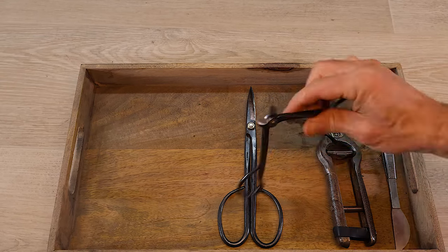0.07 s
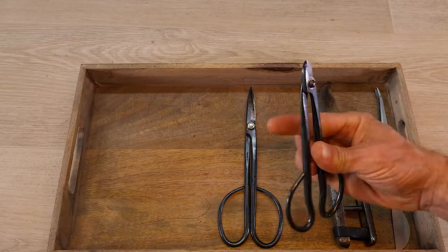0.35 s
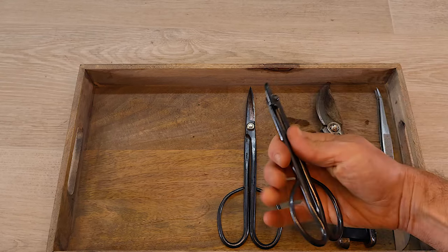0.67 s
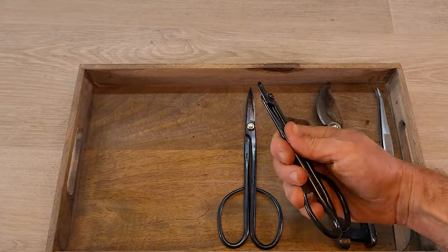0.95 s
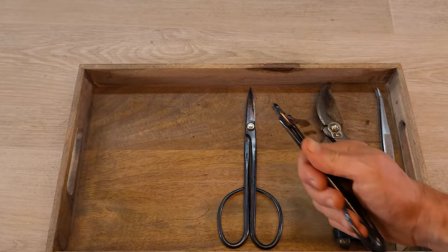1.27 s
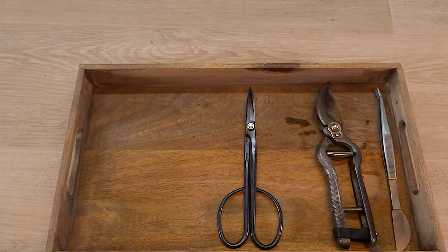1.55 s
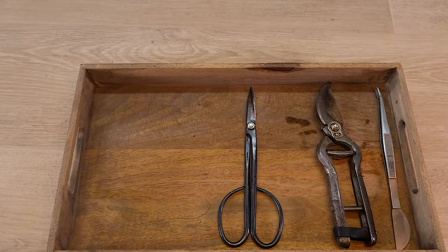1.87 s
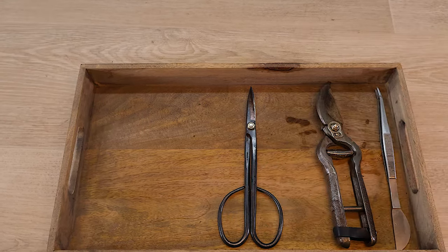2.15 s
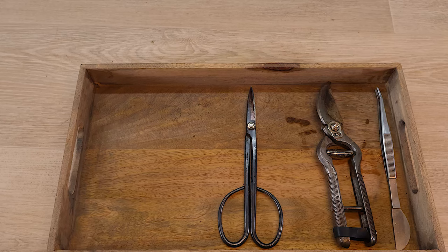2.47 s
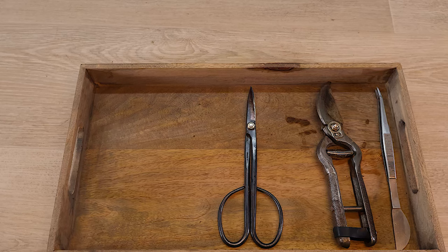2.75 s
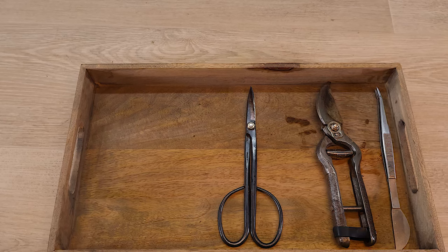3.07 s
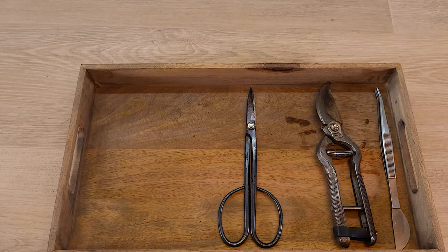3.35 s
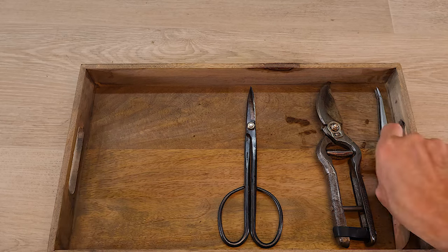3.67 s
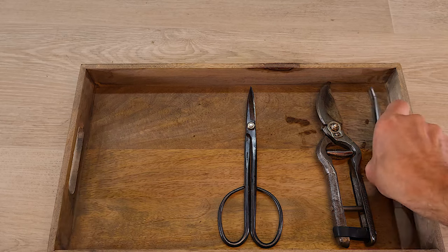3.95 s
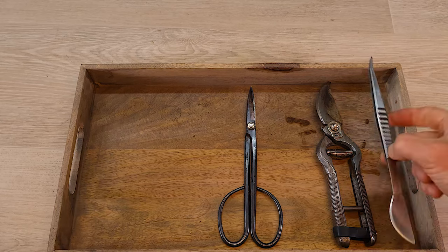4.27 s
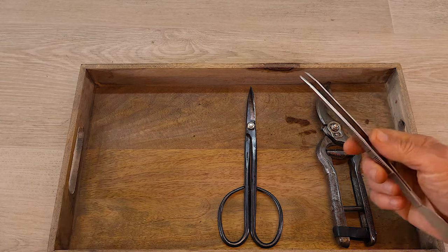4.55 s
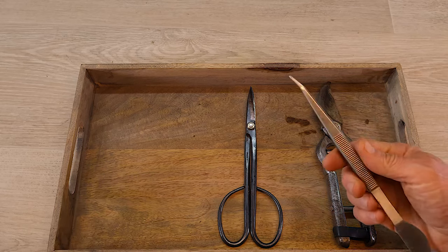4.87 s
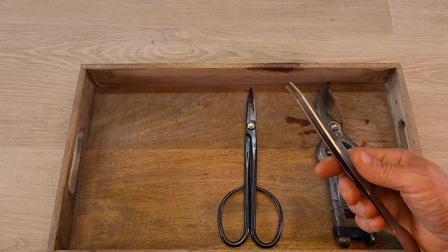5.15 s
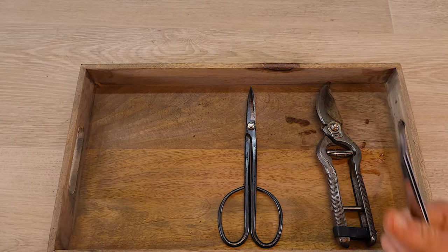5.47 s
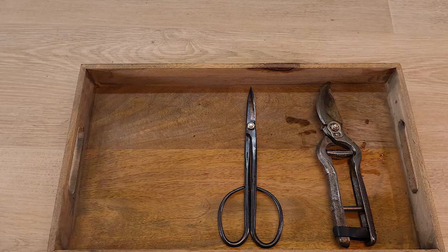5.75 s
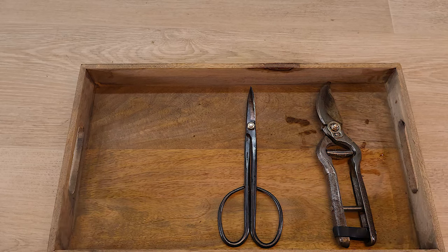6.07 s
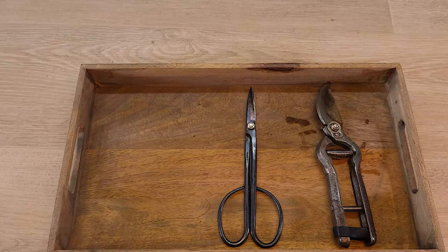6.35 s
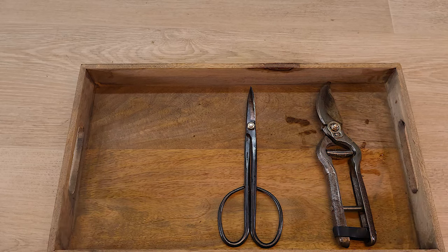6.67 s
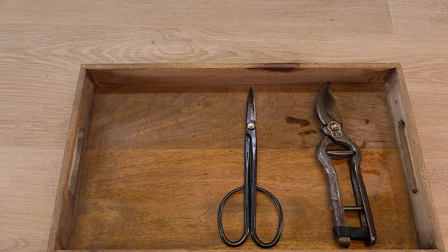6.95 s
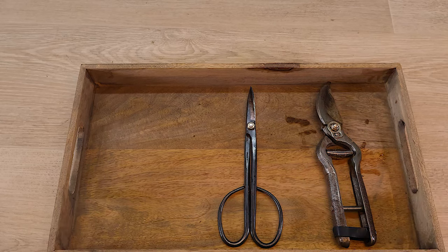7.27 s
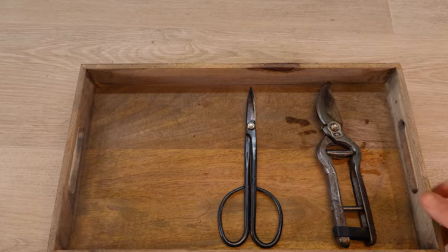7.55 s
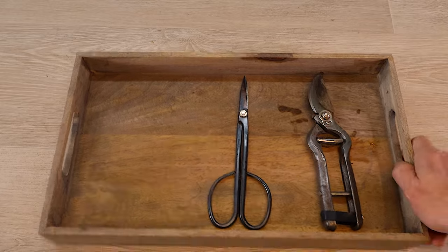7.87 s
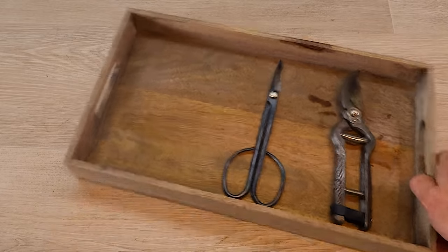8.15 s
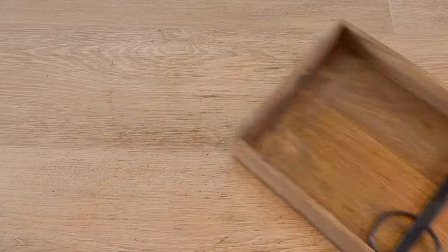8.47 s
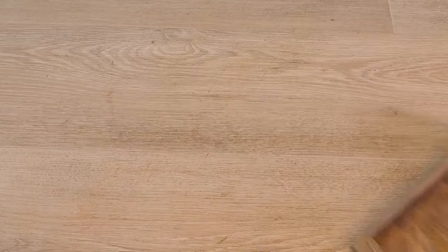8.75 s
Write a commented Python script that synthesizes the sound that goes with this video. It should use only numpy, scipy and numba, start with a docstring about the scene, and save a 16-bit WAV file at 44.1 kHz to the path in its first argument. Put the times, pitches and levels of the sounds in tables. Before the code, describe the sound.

Metal hand tools are handled on a wooden tray, heard up close over a faint room hum. Scissors clink, shears clack, and after a pause a cluster of hard knocks hits the wood. Short steel scrapes and bright, ringing clinks follow. At the end the tray scrapes across a table in a growing judder, booms once loudly and finishes with a short rasp.

```python
"""In a quiet room, a knock and a short slide on a wooden tray, then steel scissors clink.
The handle of a pair of shears clacks at 2 s, and hard knocks hit the tray around 4 s.
From about 6 s steel slides on the wood; shear blade, scissors and tweezers clink and ring.
Near 8 s the tray is dragged over the table: it judders and hisses, thumps loudly once, then ends in
a quick rasp. The microphone is close; its limiter ducks the room noise after the hardest blows."""
import sys
import numpy as np
from scipy import signal
from scipy.fft import rfft, irfft
from scipy.io import wavfile
from scipy.ndimage import uniform_filter1d, minimum_filter1d
from numba import njit

SR = 44100
rng = np.random.default_rng(int(sys.argv[2]) if len(sys.argv) > 2 else 0)


def bounce(signal):
    """Save signal as a 16-bit WAV file at the path given by the first command-line argument."""
    frames = np.transpose(np.atleast_2d(signal))
    limited = np.clip(frames, -1, 1)
    pcm = np.round(limited * 32767).astype(np.int16)
    wavfile.write(sys.argv[1], SR, pcm)


N = 392931
EVENT_SAMPLES = SR // 2


def undb(db):
    """Decibels to gain."""
    return 10 ** (np.asarray(db) / 20)


def unit_energy(x):
    """Scale to an energy of one."""
    return x / np.sqrt(np.sum(x ** 2))


def unit_rms(x):
    """Scale to an rms of one."""
    return x / np.std(x)


def add(out, start_s, x):
    """Mix x into out from start_s."""
    i = max(int(start_s * SR), 0)
    out[i:i + len(x)] += x[:N - i]


def colour(x, points, size=2048):
    """Causal filter through (Hz, dB) points, built from the cepstrum of the log gain."""
    hz, db = np.transpose(points)
    bins_hz = np.maximum(np.arange(size // 2 + 1) * SR / size, 1)
    gain = undb(np.interp(np.log(bins_hz), np.log(hz), db))
    cepstrum = irfft(np.log(gain))
    cepstrum[1:size // 2] *= 2
    cepstrum[size // 2 + 1:] = 0
    return signal.oaconvolve(x, irfft(np.exp(rfft(cepstrum))))[:len(x)]


def decay(t60_s):
    """Half a second of exponential decay."""
    return np.exp(-np.log(1000) * np.arange(EVENT_SAMPLES) / SR / t60_s)


def ring(modes, detune=0., t60_scale=0.96, count=1):
    """Damped sines; each mode splits into count detuned partials that beat."""
    t = np.arange(EVENT_SAMPLES) / SR
    out = 0
    for hz, db, t60_s in modes:
        partials_hz = hz * (1 + detune * rng.standard_normal((count, 1)))
        out += undb(db) * decay(t60_s * t60_scale) * np.sin(2 * np.pi * partials_hz * t).sum(axis=0)
    return out


def grains(scatter_db, per_s, size=N):
    """Random contacts of a rough surface: many small, a few large."""
    hit = rng.random(size) < per_s / SR
    strength = undb(scatter_db * np.minimum(rng.exponential(size=size), 5))
    return unit_rms(hit * strength * rng.standard_normal(size))


def reflected(x, t60_s, wet_db=-6):
    """Tray walls and table smear and comb a friction sound."""
    echoes = unit_energy(rng.standard_normal(EVENT_SAMPLES) * decay(t60_s))
    wet = undb(wet_db)
    return (x + wet * signal.oaconvolve(x, echoes)[:len(x)]) / np.hypot(1, wet)


def push(start_s, attack_s, hold_s, db=0, swell_db=0, release_db_per_s=307):
    """Gain of one push: smooth rise, a hold that swells or sags, fast release."""
    t = np.arange(N) / SR - start_s
    rise = np.sin(np.pi / 2 * np.clip(t / attack_s, 0, 1)) ** 2
    held = np.clip((t - attack_s) / hold_s, 0, 1)
    released_s = np.maximum(t - attack_s - hold_s, 0)
    return rise * undb(db + swell_db * held - release_db_per_s * released_s)


# Air spectrum. Each row: frequency in Hz, relative level in dB.
AIR_SPECTRUM = [(25, -14.5), (52, 17), (70, 5.5), (140, -3.5), (200, -4), (255, -6), (400, -8), (950, -2.5),
                (1500, -8.5), (2500, -13), (4200, -15), (6300, -24.5), (11000, -30.5), (15500, -31.5)]
# Hum tones. Each row: frequency in Hz, rms level in dB.
HUM_TONES = [(49.5, -68.5), (142, -59), (249, -62.5)]


def room_noise(air_rms_db=-46.5):
    """Soft steady air with a low hum."""
    t = np.arange(N) / SR
    air = unit_rms(colour(rng.standard_normal(N), AIR_SPECTRUM, size=8192))
    hum = sum(undb(db) * np.sin(2 * np.pi * (hz * t + rng.random())) for hz, db in HUM_TONES)
    return undb(air_rms_db) * air + np.sqrt(2) * hum


# Noise swells. Each row: peak time in seconds, 1/e half-length in seconds, resonance in Hz,
# bandwidth per filter pass in Hz, level in dB.
NOISE_SWELLS = [(1.249, 0.0273, 4220, 300, -53.5), (1.26, 0.036, 2120, 200, -55),
                (3.595, 0.0234, 4030, 1160, -47.5), (3.783, 0.095, 78.4, 25, -44),
                (4.014, 0.17, 2860, 806, -47), (4.047, 0.023, 2440, 2540, -33.5),
                (4.061, 0.013, 795, 260, -10.5), (5.477, 0.044, 13400, 2500, -56),
                (6.173, 0.031, 1675, 200, -40.5), (7.545, 0.019, 9900, 9100, -46.5),
                (8.485, 0.0134, 992, 80, -28), (8.6, 0.059, 1070, 200, -29.5),
                (8.886, 0.018, 1790, 503, -14)]


def noise_swells():
    """Short swells of band noise: faint rubs and the hollow body of the knock at 4 s."""
    out = np.zeros(N)
    t = np.arange(EVENT_SAMPLES) / SR - 0.25
    for peak_s, half_length_s, hz, width_hz, db in NOISE_SWELLS:
        resonance = signal.iirpeak(hz, hz / width_hz, fs=SR)
        band = signal.lfilter(*resonance, signal.lfilter(*resonance, rng.standard_normal(len(t))))
        swell = np.exp(-(t / half_length_s) ** 2)
        add(out, peak_s + t[0], undb(db) * unit_rms(band) * swell)
    return out


# Slides. Each row: start, attack and hold in seconds, level in dB, swell over the hold in dB,
# low-band rise in dB per second, grain scatter in dB.
SLIDES = [ (0, 0.00067, 0.037, -23.5, -6.5, 34, 2), (3.695, 0.027, .005, -41.5, 1, 20, 2),
          (4.08, 0.02, 0.077, -18, -6, 20, 4), (5.723, 0.12, 0.14, -23.5, 2, 26, 0),
          (6.578, 0.04, 0.16, -24, -17.5, -12, -0.5), (7.228, 0.073, 0.087, -49, -0.5, 5, 3),
          (7.55, 0.019, 0.04, -18.5, 6, 87, 2.5), (7.602, 0.037, 0.12, -38.5, 3, 19, -2)]
# One spectrum per slide. Each point: frequency in Hz, relative level in dB.
SLIDE_SPECTRA = [
    [(70, -46), (145, 11), (300, -60), (500, -30), (800, -2.5), (1200, -2.5), (1800, -16), (3100, -19.5),
     (15000, -51.5)],
    [(1000, -7), (2500, 0.5), (4500, 1), (9000, -17.5), (14000, -23)],
    [(300, 2.5), (1200, 0), (2000, 7.5), (3500, 11.5), (4200, 1), (8500, -7), (10500, -28), (15500, -18)],
    [(200, -35), (560, -14), (880, -12), (1200, -17.5), (2300, -13), (3200, -6), (4600, 0.5), (6000, -6),
     (8400, -6), (12000, -14.5), (15500, -25)],
    [(250, -30), (450, -14), (1400, -11.5), (2800, -0.5), (3850, 3), (6000, -9), (9000, -12.5),
     (15500, -25)],
    [(1500, -9.5), (4000, 1), (8000, -4), (11000, -18), (15000, -23.5)],
    [(700, -35.5), (1100, -19.5), (2500, -10.5), (3300, 1.5), (4150, -0.5), (5400, -5), (6700, -17.5),
     (8500, -15), (11500, -16), (14000, -24), (15500, -24)],
    [(900, -16), (1900, -5), (2700, -10), (3700, -7.5), (5400, -3.5), (6700, -13.5), (8500, -12),
     (15000, -32)],
]


def steel_slides(contacts_per_s=16000, split_hz=3000):
    """Steel scrapes on wood: dense contacts, mostly growing darker as each slide goes on."""
    out = np.zeros(N)
    lowpass = signal.butter(2, split_hz, fs=SR, output="sos")
    for slide, spectrum in zip(SLIDES, SLIDE_SPECTRA):
        start_s, attack_s, hold_s, db, swell_db, low_db_per_s, scatter_db = slide
        i = int(start_s * SR) + np.arange(EVENT_SAMPLES)
        scrape = colour(grains(scatter_db, contacts_per_s, size=len(i)), spectrum)
        low = signal.sosfiltfilt(lowpass, scrape)
        from_mid_hold_s = i / SR - start_s - attack_s - hold_s / 2
        low_gain = undb(np.clip(low_db_per_s * from_mid_hold_s, -12, 3))
        envelope = push(start_s, attack_s, hold_s, db, swell_db)[i]
        out[i] += (scrape - low + low_gain * low) / np.std(scrape) * envelope
    return reflected(out, t60_s=0.07)


# Modes of the tray on the table. Each row: frequency in Hz, relative level in dB, nominal t60 in seconds.
JUDDER_MODES = [(140.6, 1.5, 0.66), (231, 0.5, 0.081), (246, -9.5, 0.15), (286.7, 4.5, 0.16),
                (342, -4.5, 0.15), (499, -6, 0.13), (588, 8.5, 0.027), (895, -12, 0.097)]
# Friction spectra. Each row: frequency in Hz, relative level in dB.
RASP_SPECTRUM = [(150, -28), (400, -5), (570, -9), (740, -9), (1030, -0.5), (1350, -3.5), (1800, -6),
                 (2400, -6), (3500, -16), (8000, -34)]
GRIT_SPECTRUM = [(1200, -36), (2300, -8), (3200, 5.5), (4800, 4.5), (6500, -1), (9000, -9.5), (15000, -61)]
HISS_SPECTRUM = [(4000, -47), (7000, -6), (8300, 4.5), (11000, 2), (15500, 1)]
# The pull. Each row: time in seconds, relative sliding speed in dB.
PULL_SPEED = [(7.79, -34), (7.85, -27), (7.94, -25), (8.03, -31.5), (8.1, -26), (8.17, -20.5), (8.3, -17.5),
              (8.48, -6.5), (8.63, -6), (8.68, -9), (8.705, -4.5), (8.79, -6), (8.9, 0.5)]
# Judder, rasp, grit, hiss. Each row: rub and bite levels in dB at unit speed, speed exponent of the bite.
FRICTION_LAWS = [(-45, -37, 4), (-37.5, -21, 2), (-38.5, -20, 2.07), (-58, -21, 0.92)]
# Stick-slip bouts. Each row: start, attack and hold in seconds, level in dB, swell over the hold in dB.
JUDDER_BOUTS = [(8.398, 0.017, .25, -34, 15), (8.675, 0.032, 0.012, -11, -3.5)]
# The tray's edge catches. Each row: start, attack and hold in seconds, rasp and grit levels in dB.
EDGE_CATCHES = [(8.298, 0.012, 0.09, -59, -35.5), (8.45, 0.0084, 0.046, -24.5, -21),
                (8.558, 0.057, 0.01, -24.5, -27), (8.863, 0.03, 0.023, -18.5, -16.5)]


def tray_drag():
    """Wood on wood: stick and slip shake the tray while the grain rasps and hisses."""
    judder = signal.oaconvolve(grains(scatter_db=3.8, per_s=600), ring(JUDDER_MODES))[:N]
    judder = signal.sosfilt(signal.butter(2, 100, "high", fs=SR, output="sos"), judder)
    judder /= np.sqrt(uniform_filter1d(judder ** 2, size=1024) + 1e-9)  # flat: the pull sets its level
    rasp = unit_rms(reflected(colour(grains(1.5, 3000), RASP_SPECTRUM), t60_s=0.069))
    grit = unit_rms(reflected(colour(grains(0.85, 7200), GRIT_SPECTRUM), t60_s=0.026))
    hiss = unit_rms(colour(grains(0.75, 20000), HISS_SPECTRUM))
    speed = undb(np.interp(np.arange(N) / SR, *np.transpose(PULL_SPEED), left=-150, right=-150))
    judder_gain, rasp_gain, grit_gain, hiss_gain = (
        np.hypot(undb(rub_db) * np.sqrt(speed), undb(bite_db) * speed ** exponent)
        for rub_db, bite_db, exponent in FRICTION_LAWS)
    for bout in JUDDER_BOUTS:
        judder_gain = np.hypot(judder_gain, push(*bout))
    for start_s, attack_s, hold_s, rasp_db, grit_db in EDGE_CATCHES:
        catch = push(start_s, attack_s, hold_s)
        rasp_gain = np.hypot(rasp_gain, undb(rasp_db) * catch)
        grit_gain = np.hypot(grit_gain, undb(grit_db) * catch)
    return judder * judder_gain + rasp * rasp_gain + grit * grit_gain + hiss * hiss_gain


# Tray bumps. Each row: start in seconds, peak level in dB, contact time in seconds.
THUMPS = [(3.869, -26.5, 0.0021), (4.065, -25.5, 0.003), (8.025, -30, 0.0092), (8.311, -34, 0.0096),
          (8.694, -5, 0.0052)]
# Table top modes. Each row: frequency in Hz, relative level in dB, nominal t60 in seconds.
TABLE_MODES = [(81.5, -11, 0.83), (113.5, -0.5, 0.23), (142.7, 2.5, 0.58), (272, -6, 0.35), (532, -1, 0.16),
               (667, -11, 0.32), (865, 6.5, 0.2)]


def table_thumps():
    """The tray bumps and the table top booms; longer contact, duller boom."""
    out = np.zeros(N)
    for start_s, peak_db, contact_s in THUMPS:
        boom = signal.oaconvolve(ring(TABLE_MODES), decay(3 * contact_s))
        boom = signal.sosfilt(signal.butter(3, 70, "high", fs=SR, output="sos"), boom)
        add(out, start_s, undb(peak_db) * boom / np.max(np.abs(boom)))
    return out


def contact_spectrum(low_hz, high_hz, tilt_db_per_khz, skirt_db_per_oct, floor_db=-52):
    """(Hz, dB) points of a blow: a tilted band with skirts; softer contact is less bright."""
    hz = np.geomspace(50, SR / 2, 96)
    tilt_db = tilt_db_per_khz * np.maximum(hz - low_hz, 0) / 1000
    outside_oct = np.maximum(np.log2(low_hz / hz), 0) + np.maximum(np.log2(hz / high_hz), 0)
    return np.column_stack([hz, np.maximum(tilt_db - skirt_db_per_oct * outside_oct, floor_db)])


def blows(rows, modes, crack_t60_s, chatter_t60_s, room_t60_s,
          skirt_db_per_oct, detune, body_db, body_t60_scale):
    """Each blow cracks, chatters in tiny rebounds, rings the modes and dies away in the room."""
    out = np.zeros(N)
    body = unit_energy(ring(modes, t60_scale=body_t60_scale))  # damped in contact: only colours the tail
    body_gain = undb(body_db)
    for start_s, db, low_hz, high_hz, tilt_db_per_khz, ring_db, chatter_db, room_db in rows:
        noise = rng.standard_normal((2, EVENT_SAMPLES))
        crack = unit_energy(noise[0] * decay(crack_t60_s))
        chatter = unit_energy(grains(1.0, 7000, size=EVENT_SAMPLES) * decay(chatter_t60_s))
        room = unit_energy(noise[1] * (decay(room_t60_s) - decay(room_t60_s / 8)))  # builds, then fades
        tail = undb(chatter_db) * chatter + undb(room_db) * room
        tail = (tail + body_gain * signal.fftconvolve(tail, body)[:len(tail)]) / np.hypot(1, body_gain)
        ringing = undb(ring_db) * unit_energy(ring(modes, detune, count=3))
        spectrum = contact_spectrum(low_hz, high_hz, tilt_db_per_khz, skirt_db_per_oct)
        add(out, start_s, undb(db) * colour(unit_energy(crack + tail + ringing), spectrum))
    return out


# Blows on the tray. Each row: start in seconds, level before filtering in dB, low and high band edges
# in Hz, tilt in dB per kHz, then ring, chatter and room energies in dB relative to the crack.
TRAY_BLOWS = [ (.056, 14.5, 860, 5060, -26, 2.5, -24, -3), (3.858, 9, 1480, 5980, -2.5, -10, 1, -18),
              (3.867, 20, 720, 10000, -2.5, 0, -5, 2), (4.046, 34, 990, 6850, -2, 0.5, 13, -29),
              (4.0648, 44, 1480, 15000, -2.5, -36, -5, -4.5)]
# Tray modes. Each row: frequency in Hz, relative level in dB, nominal t60 in seconds.
TRAY_MODES = [(566, -14, .12), (797, -42, 0.22), (864, 4.5, 0.24), (944, 6, 0.2), (1107, 4, 0.15),
              (1870, -54.5, 0.088), (2200, -4.5, 0.15), (3556, 20, 0.046), (4000, -22, 0.17),
              (4790, 16, 0.094), (8200, -1, 0.16), (12300, 6, 0.23), (13300, 11.5, 0.38)]


def tray_knocks():
    """Steel knocks on the wooden tray: a long, dull crack."""
    return blows(TRAY_BLOWS, TRAY_MODES, crack_t60_s=0.065, chatter_t60_s=0.061, room_t60_s=0.19,
                 skirt_db_per_oct=10, detune=0.006, body_db=-5.5, body_t60_scale=0.24)


# Tweezer blows and modes. Columns as for the tray.
TWEEZER_BLOWS = [ (4.0775, -11.5, 4660, 15800, 2, 3.1, 5, 5.5),
                 (6.8595, -4, 2700, 15000, 1.68, 7.4, 12.5, 6.5),
                 (6.908, 3.5, 4600, 15000, -1.1, 15, -19, 14)]
TWEEZER_MODES = [(3870, 5, 0.14), (5650, -4, 0.47), (7720, 3, .4), (9170, 1, 0.18), (9800, -1, 0.29),
                 (12200, -13, .13), (12800, 8, 0.13), (13600, -0.5, 0.13), (14450, -12, 0.097),
                 (14800, -1, .15)]


def tweezers():
    """Light steel arms ring and chatter long after a tap."""
    return blows(TWEEZER_BLOWS, TWEEZER_MODES, crack_t60_s=0.013, chatter_t60_s=0.24, room_t60_s=0.24,
                 skirt_db_per_oct=33.5, detune=0.0031, body_db=1.5, body_t60_scale=0.4)


# Blows and modes of the shears' handle and blade. Columns as for the tray.
HANDLE_BLOWS = [ (2.0688, 27, 3005, 10950, 0.6, -2, -8, 4.5), (2.1487, 7, 3000, 8500, 0.6, -17.5, -2, -3),
                (2.2065, 1, 4700, 7900, -0.2, -12, 9, 3)]
HANDLE_MODES = [(2060, -3, 0.36), (2800, -5, 0.2), (4650, -31.5, 0.14), (5200, 1.5, 0.065),
                (6800, -14.5, 0.14), (8500, -13.5, 0.19), (8950, -0.5, .14), (10050, -4.5, 0.06),
                (12800, -41, 0.051), (13200, 0, 0.12)]
BLADE_BLOWS = [ (6.1575, -4, 1584, 9500, -1.5, -13, -8, 6.8), (6.179, 14, 4160, 11800, -1.84, 0, -20, 3.9),
               (6.3485, 7, 4200, 15000, -0.7, 0, 4, 5), (6.9532, 24.5, 3380, 15400, 0.62, 16, 11, 6)]
BLADE_MODES = [(4584, 9, 0.13), (5350, 1, 0.2), (6140, -1, 0.14), (8150, 3.5, 0.19), (9270, 6.5, 0.16),
               (10020, 5.5, 0.15), (10900, -25, 0.093), (12120, 8, 0.085), (14110, 10.5, 0.155),
               (13200, -8, 0.119)]


def shears():
    """The struck handle clacks; the blade cracks sharply and rings higher."""
    handle = blows(HANDLE_BLOWS, HANDLE_MODES, crack_t60_s=0.012, chatter_t60_s=0.015, room_t60_s=0.19,
                   skirt_db_per_oct=29, detune=0.015, body_db=-1.5, body_t60_scale=0.035)
    blade = blows(BLADE_BLOWS, BLADE_MODES, crack_t60_s=0.0027, chatter_t60_s=0.11, room_t60_s=0.23,
                  skirt_db_per_oct=28, detune=0.0049, body_db=-5.5, body_t60_scale=0.08)
    return handle + blade


# Scissor blows and modes. Columns as for the tray.
SCISSOR_BLOWS = [ (.4565, 10.5, 4220, 15000, .3, 6, 9, -21), (.4608, 4, 2900, 11500, 0.29, -17, -11, 0),
                 (.583, -5.5, 3350, 11500, -1.1, -5, 11.5, 10),
                 (.6882, 18.5, 4870, 13760, 1.2, -3, -26.5, -7),
                 (2.6283, 7.5, 3250, 14500, 0.46, -1.5, 4.5, 11),
                 (2.656, 1.5, 3300, 13000, 0.026, 5, -1, 8), (6.5755, 16, 3900, 13900, -0.55, 0, -3, 6.5)]
SCISSOR_MODES = [(3930, -3.5, 0.3), (5150, 8, .05), (5890, 4, 0.18), (8060, 7, 0.063), (8150, 3, 0.088),
                 (9370, 5.5, 0.017), (12140, 0, 0.12), (11380, 10.5, 0.13), (12700, 1, 0.14),
                 (14350, 12, 0.058), (14660, -22.5, .12)]


def scissors():
    """Steel on steel: bright clinks with brief chatter."""
    return blows(SCISSOR_BLOWS, SCISSOR_MODES, crack_t60_s=0.007, chatter_t60_s=0.025, room_t60_s=0.16,
                 skirt_db_per_oct=27.5, detune=0.0034, body_db=-8, body_t60_scale=0.38)


def scene():
    """Mono sum at the microphone."""
    steel = scissors() + shears() + tweezers()
    wood = tray_knocks() + tray_drag() + table_thumps()
    return (steel + wood + steel_slides() + noise_swells() + room_noise())[None]


@njit
def follow_peaks(magnitude, release):
    """Instant rise, slow fall."""
    out, peak = np.empty(len(magnitude)), 0.
    for i in range(len(magnitude)):
        peak = max(magnitude[i], peak * release)
        out[i] = peak
    return out


def record(dry, ceiling=0.94, release_s=0.17, clip_level=0.85, low_cut_hz=38, high_cut_hz=15700):
    """Rumble filter, peak limiter with slow recovery, soft clip, low-pass."""
    x = signal.sosfilt(signal.butter(4, low_cut_hz, "high", fs=SR, output="sos"), dry)
    peak = follow_peaks(np.abs(x[0]), np.exp(-1 / (release_s * SR)))
    gain = ceiling / np.maximum(peak, ceiling)
    x = x * uniform_filter1d(minimum_filter1d(gain, size=45), size=45)  # brief look-ahead
    x = x / (1 + (x / clip_level) ** 6) ** (1 / 6)
    return signal.sosfilt(signal.ellip(10, .2, 80, high_cut_hz, fs=SR, output="sos"), x)


dry = scene()
out = record(dry)
bounce(out)
```